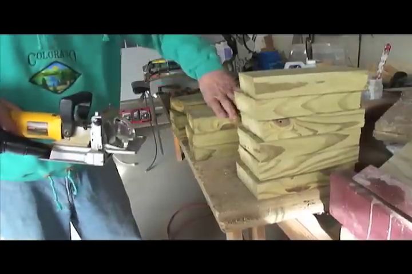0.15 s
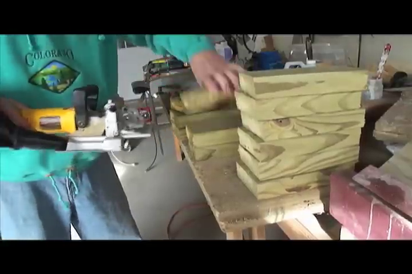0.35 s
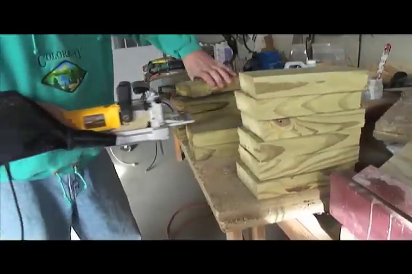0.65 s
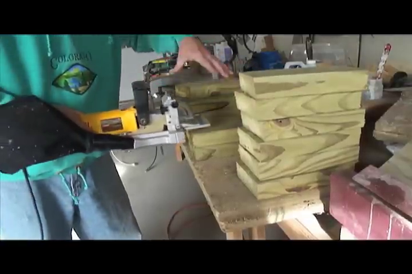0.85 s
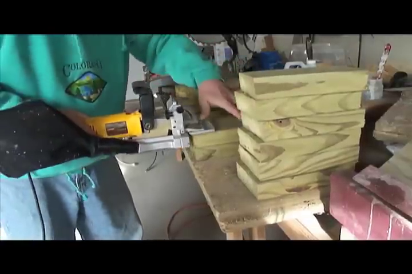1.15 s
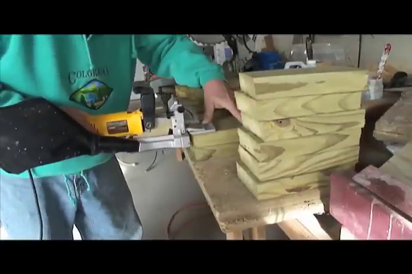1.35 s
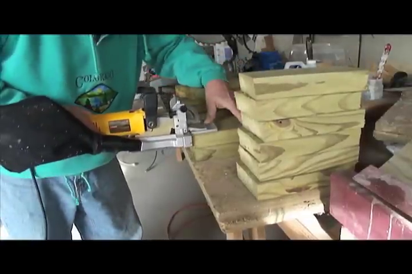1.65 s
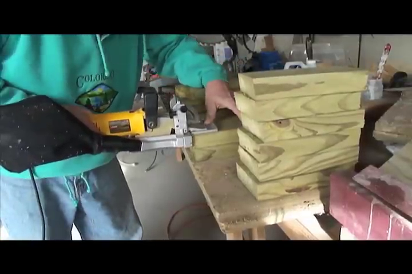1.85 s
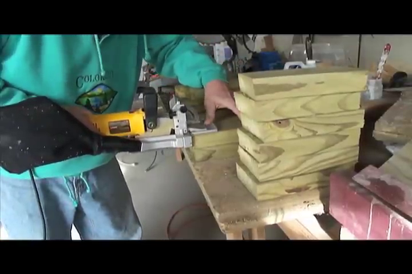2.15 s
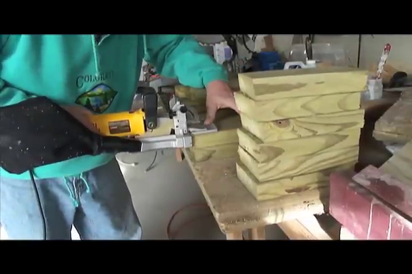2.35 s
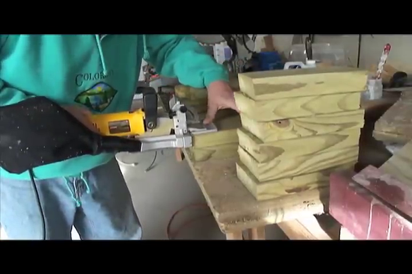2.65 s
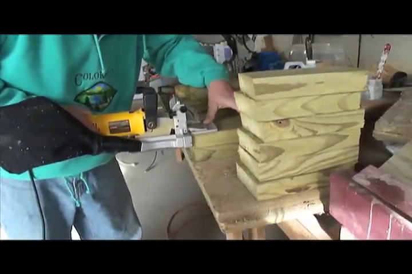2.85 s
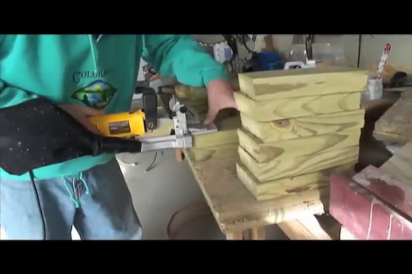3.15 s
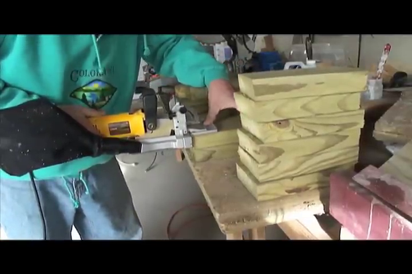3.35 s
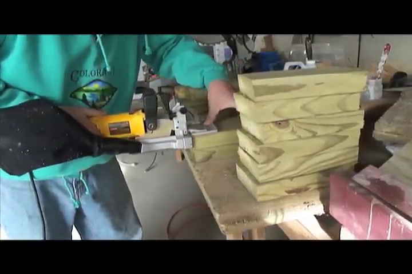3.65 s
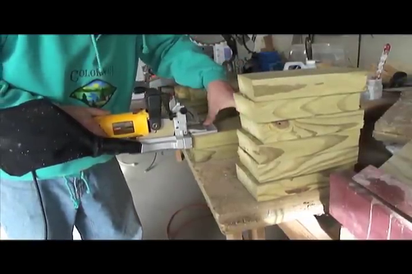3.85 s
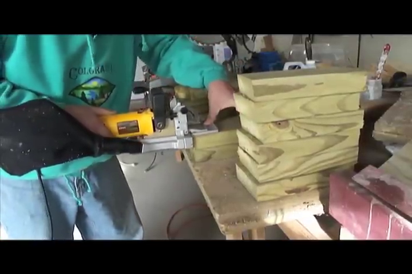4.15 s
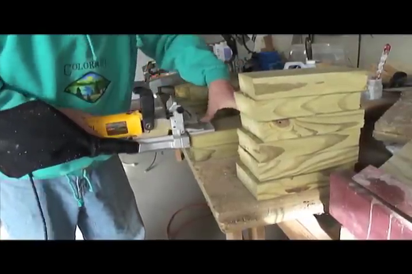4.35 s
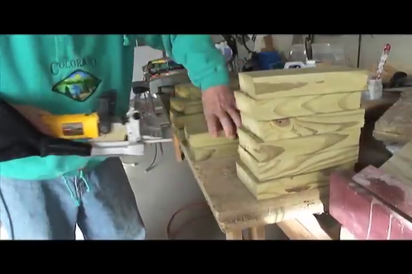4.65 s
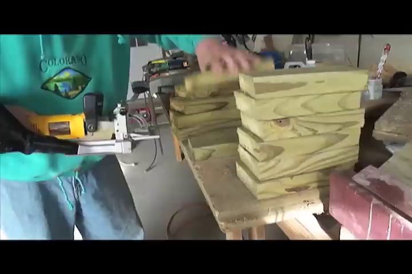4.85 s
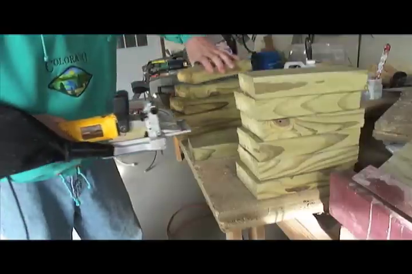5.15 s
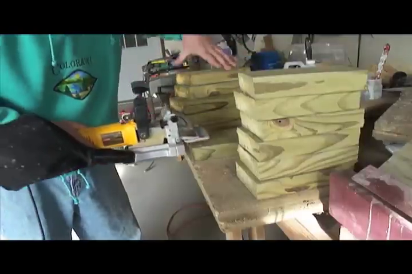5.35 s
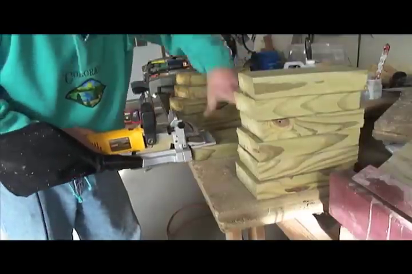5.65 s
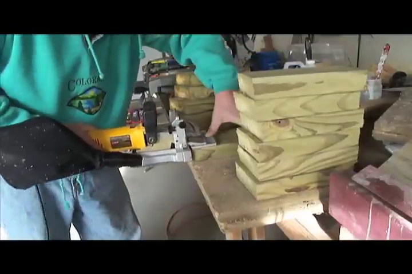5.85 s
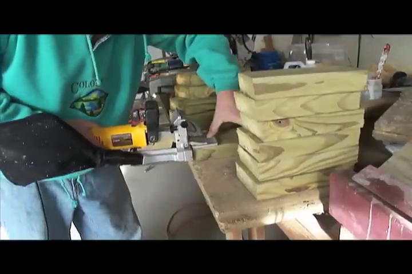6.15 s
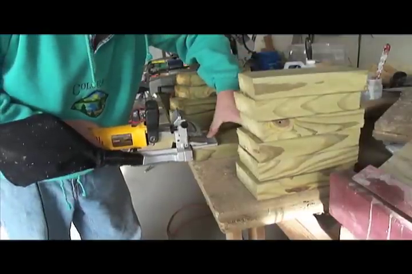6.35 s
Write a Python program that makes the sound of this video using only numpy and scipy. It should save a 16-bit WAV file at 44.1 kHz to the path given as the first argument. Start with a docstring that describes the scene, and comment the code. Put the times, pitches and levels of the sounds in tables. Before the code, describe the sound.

In a workshop, a biscuit joiner coasts down, its whine sliding lower while loose gears chatter and a board knocks on the bench. A switch snaps, the motor roars up, sags as the blade bites wood, recovers and is cut off. It coasts down again with gear rattle, board clacks and dull low bumps. Close microphone, short room echo, faint rumble.

```python
"""A biscuit joiner in a workshop: its motor whine sinks as it coasts, gears rattle and boards knock.
The switch snaps, the motor runs up, bogs as the blade plunges into wood, recovers and is cut off.
It coasts again; boards knock on the bench and dull low bumps follow, over a rumble that never stops.
Sine waves make the whine, hum and blade teeth; shaped noise makes air, buzz, growl, bumps and rumble.
Short noise bursts ring the gear case; fading sines make the switch and boards; hits echo in the room."""
import sys
import numpy as np
from scipy import signal
from scipy.fft import rfft, irfft, next_fast_len
from scipy.io import wavfile
from scipy.ndimage import map_coordinates

SR = 44100
rng = np.random.default_rng(int(sys.argv[2]) if len(sys.argv) > 2 else 0)


def inscribe(sig):
    """Save sig as 16-bit PCM at rate SR to the path in sys.argv[1].

    A 1-D sig is mono; a 2-D sig holds one channel per row.
    Samples are clipped to [-1, 1] before scaling.
    """
    pcm = np.round(np.clip(np.atleast_2d(sig).T, -1, 1) * 32767)
    wavfile.write(sys.argv[1], SR, pcm.astype(np.int16))


N = 286385  # length in samples

# All table levels are relative: the functions add their own trims.
# Motor under power, running up, bogging, recovering: t/s, whine f/Hz, whine level/dB, octave level/dB
POWERED_WHINE = [(3.49, 560, -70, -80), (3.52, 1500, -36, -48), (3.54, 1750, -27, -38),
                 (3.552, 1860, -23, -28), (3.57, 2150, -26, -44), (3.6, 2620, -26, -50),
                 (3.63, 3200, -32, -52), (3.75, 4000, -30, -52), (3.79, 4370, -39, -52),
                 (3.86, 4310, -38, -54), (3.93, 3780, -30, -54), (3.99, 3330, -32, -48),
                 (4.02, 3250, -40, -52), (4.05, 3560, -28, -52), (4.12, 3900, -29, -46),
                 (4.2, 4500, -34, -45), (4.25, 4630, -36, -50), (4.3, 4542, -36, -47)]
# How well the casing radiates the whine: whine f/Hz, whine level/dB, octave level/dB
RADIATED = [(560, -70, -80), (1100, -44, -64), (1400, -44, -60), (1650, -39, -56), (1900, -39, -46),
            (2060, -35, -54), (2250, -38, -45), (2400, -39, -44), (2600, -32, -44), (2950, -35, -43),
            (3280, -31, -45), (3450, -35, -50), (3750, -34, -50), (4200, -34, -44.5), (4600, -36, -47)]
# Noise under power: t/s, cooling air level/dB, buzz level/dB, vent hiss level/dB, growl level/dB
POWERED_NOISE = [(3.49, -43, -38, -52, -58), (3.5, -28, -40, -54, -25.5), (3.55, -27, -46, -40, -26),
                 (3.66, -27.5, -35, -36.5, -25.5), (3.72, -25.5, -27, -38, -29.5),
                 (3.86, -30, -36, -39, -32.5), (3.96, -34.5, -37, -38, -36), (4.0, -30.5, -39, -33, -41),
                 (4.05, -30, -38, -38, -30.5), (4.15, -25, -37, -37, -36), (4.3, -25.5, -28, -46, -46)]
# Cooling air spectrum: f/Hz, level/dB
AIR_SPECTRUM = [(35, -94), (60, -76), (335, -13), (408, -12), (750, -5), (912, -8), (995, -5), (1750, -2),
                (2230, -1.5), (4010, -8.5), (5210, -15), (8410, -25.5), (10900, -45.5), (14200, -91),
                (22000, -120)]
# Vent hiss spectrum: f/Hz, level/dB
VENT_SPECTRUM = [(2650, -47), (4500, 4.5), (5220, -3.5), (6080, 1.5), (6870, -8.5), (9660, -6.5),
                 (10900, -19), (14200, -62), (22000, -120)]
# Housing resonances: f/Hz, width/Hz, level/dB
HOUSING = [(792, 48.5, 0.5), (922, 98, 1), (1047, 101, 2.5)]
# Growl resonances: f/Hz, width/Hz, level/dB
GROWL = [(607, 30, -4), (755, 79, 1), (917, 34, 1), (1780, 89, -9.5)]
# Low hum around the powered spell: t/s, f/Hz, level/dB
HUM = [(3.49, 361, -80), (3.5, 365.5, -39), (3.65, 346.7, -42.5), (3.71, 338, -62), (3.8, 331.4, -46),
       (3.93, 317.4, -44), (3.99, 317, -65), (4.05, 343, -46), (4.2, 346, -46), (4.42, 326, -51),
       (4.55, 320, -86)]
# Loudness of the blade's tooth harmonics by pitch: f/Hz, level/dB
TEETH = [(630, 2), (800, -14), (2900, 0), (4400, 4), (5000, 5), (5600, 7), (6300, 3), (6900, -2), (7550, 2),
         (7900, -5), (8200, 0), (8600, -7), (9400, -5), (10700, -14)]
# Loose gear chatter: t/s, level/dB
CHATTER = [(0, -22), (1.95, -20), (2.04, -22), (2.1, -21.5), (3, -33.5), (3.49, -44), (3.6, -23),
           (4.3, -21), (5.5, -23.5), (6.49, -23.5)]
# Loud single clacks of the gears, a few with the switch snaps: t/s, level/dB, low part over that/dB
CLACKS = [(.424, -21, -17), (0.521, -13.5, -21), (0.7434, -17, 3), (.801, -16, -13), (0.821, -16, -12),
          (.8779, -18, -13), (.9208, -17, -15), (1.0464, -8.5, -24), (1.086, -10, -10), (1.183, -5, -23),
          (1.3224, -10, -28), (1.38, -13, -20), (1.4152, -12, -9), (1.4965, -20, -16), (1.5244, -13, -25),
          (1.551, -9, -10), (1.6162, -14, -18), (1.6413, -12, -6), (1.73, -16.5, 3), (1.8715, -12, -11),
          (1.8935, -13, -28), (1.9114, -6, -12), (2.0765, -10.5, -19), (2.0982, -7, -17), (2.122, -15, -8),
          (2.145, -13.5, -1.5), (2.1674, -11, -5), (2.192, -10.5, -16), (2.2253, -12, -11),
          (2.248, -13, -8), (2.2738, -8.5, -19), (2.3067, -5.5, -26), (2.333, -11, -13),
          (2.3575, -8.5, -4.5), (2.387, -10, -11), (2.415, -12, -6), (2.454, -15, -14), (2.469, -11, -26),
          (2.4928, -14.5, -2), (2.5277, -12.5, -15), (2.5548, -15.5, 0), (2.58, -20, -3),
          (2.618, -9.5, -13), (2.6514, -8.5, -6), (2.6842, -11, -10), (2.694, -15, -11),
          (2.7137, -10, -4.5), (2.751, -8.5, -13), (2.7882, -10.5, -3.5), (2.8194, -10, -9),
          (2.8574, -14, -10), (2.8747, -8, -9), (2.9016, -13.5, -14), (2.9285, -11, -13), (2.97, -12, -28),
          (2.9822, -19, -20), (3.012, -13.5, -13), (3.044, -15.5, -1), (3.071, -14.5, -21),
          (3.104, -9.5, -4), (3.1656, -10.5, -10), (3.191, -18.5, 1), (3.2238, -13, -2),
          (3.258, -11.5, -25), (3.2812, -26, 8.5), (3.342, -13.5, -0.5), (3.3863, -12.5, -11),
          (3.4083, -18, -6.5), (3.429, -21, -1), (3.4575, -16.5, -20), (3.492, -9, -6), (3.498, -3, -15),
          (3.549, -7, -10), (3.59, -13, -7), (3.674, -8, -16), (4.0718, -10, -15), (4.2817, -15, -24),
          (4.554, -11, -19), (4.673, -10, -6), (5.326, -7, -21), (5.5304, -10, -8), (5.597, -6.5, -21),
          (5.6527, -5, -25), (5.711, -6, -30), (5.755, -14, -23), (5.7767, -4.5, -16), (5.8318, -14, -16),
          (5.858, -9, -10), (5.901, -16, -11), (5.97, -14, -5), (5.993, -12.5, -27), (6.015, -13, -10),
          (6.0372, -7, -15), (6.0663, -13, -7), (6.104, -9.5, -5), (6.131, -13.5, -16), (6.196, -14, -5),
          (6.222, -14, -12), (6.27, -12.5, -8), (6.2903, -8.5, -16), (6.3085, -6.5, -25),
          (6.329, -7.5, -27), (6.4496, -9, -16), (6.4727, -14, -11)]
# Gearbox resonances: f/Hz, width/Hz, level/dB
GEARBOX = [(1574, 73, -8.5), (2319, 206, 2), (2985, 190, -4.5), (3365, 206, -7), (4500, 410, -12),
           (5075, 293, -11.5), (6077, 325, -10.5), (7750, 150, -21.5), (8780, 126, -21), (9580, 68, -21)]
# Snaps of the switch: t/s, level/dB
SNAPS = [(3.494, -10), (3.495, -27), (3.505, -15), (4.283, -6.5)]
# Ringing tones of the switch: f/Hz, level/dB, time to fade by 60 dB/s
SWITCH_TONES = [(1083, 2.5, 0.04), (1256, -1, 0.027), (1650, -7, 0.018), (1776, 1.5, 0.043),
                (2160, -7, 0.01), (3530, -7, 0.011)]
# Boards put down: t/s, level/dB, clack relative to that level/dB
KNOCKS = [(0.665, -27, 14), (0.689, -40, 15), (0.91, -38, 2), (5.184, -29.5, 25.5), (5.248, -35, 25.5)]
# Ringing tones of the bench: f/Hz, level/dB, time to fade by 60 dB/s
BENCH_TONES = [(130, -14, 0.23), (138, -4, 0.17), (161, 2, 0.074), (189, 2, .08), (282, 6.5, 0.093),
               (353, -2, 0.11)]
# Ringing tones of a board: f/Hz, level/dB, time to fade by 60 dB/s
BOARD_TONES = [(530, -12.5, 0.056), (720, -11, 0.054), (1070, -15, .04), (1391, 0.5, 0.055),
               (1580, 0, 0.067), (1686, 0, 0.061)]
# Dull low bumps: t/s, level/dB
BUMPS = [(5.725, -40), (5.779, -43), (5.809, -44), (5.849, -49), (5.969, -38), (5.995, -18.5), (6.042, -23),
         (6.06, -26), (6.088, -28), (6.109, -30), (6.129, -24.5), (6.163, -29), (6.199, -43), (6.219, -39),
         (6.394, -35)]
# Bump spectrum: f/Hz, level/dB
BUMP_SPECTRUM = [(15, -58), (40, -9), (110, -5), (189, -2), (309, -6.5), (348, -13), (554, -17), (600, -22),
                 (780, -50), (1320, -120)]
# How long the room rings: f/Hz, time to fade by 60 dB/s
ROOM_FADE = [(100, 0.85), (1000, 0.13), (10000, 0.12)]
# Workshop rumble: t/s, level/dB
RUMBLE = [(0, -70), (1, -58), (2.2, -59), (3.3, -54), (4.4, -57), (5, -64.5), (5.4, -52.5), (6.49, -58)]
# Rumble spectrum: f/Hz, level/dB
RUMBLE_SPECTRUM = [(25, -40), (60, -17), (130, -5.5), (200, -8), (255, 3.5), (290, -5), (340, 6),
                   (450, -9.5), (900, -36), (2000, -120)]

SWITCH_ON_S = 3.49
FIRST_OFF_S, SECOND_OFF_S = -.205, 4.3  # the first cut comes before the sound begins
# Coasting: whine pitch at the cut, share of it lost per second to air, steady loss to the bearings
FREE_HZ, DRAG_PER_S, FRICTION_HZ_PER_S = 4542, .1953, 633.5
RAGGED_COASTING, RAGGED_POWERED = .12, .57  # share of smear in each tone, 0 to 1
# Coasting noise levels, before trims
AIR_DB, AIR_DB_PER_KHZ = -41.5, 4  # level extended down to zero pitch, growth with whine pitch
BUZZ_DB, BUZZ_FADES_HZ, BUZZ_DB_PER_KHZ = -32.5, 1060, 20  # fades below this whine pitch
HISS_DB = -47
CUT_S, CUT_LENGTH_S, CUT_RAMP_S, CUT_DB = 3.74, .27, .04, -46  # blade in wood; ramp is in and out
TOOTH_RATIO = 7  # whine cycles per tooth bite
CHATTER_RATE, CHATTER_RATE_POWERED = 90, 130  # average clacks per second
TOP_HZ = 11000


def motor():
    """The spinning armature whines while its airflow, casing and blade add their own sounds."""
    hz, on = speed()
    whine_db, octave_db, air_db, buzz_db, hiss_db, growl_db = motor_levels(hz, on)
    turn = 2 * np.pi * np.cumsum(hz) / SR + .2 * wobble(150)
    air = amp(air_db + 0.4 * wobble(60) + 0.94 * wobble(15)) * coloured(AIR_SPECTRUM)
    hiss = amp(hiss_db - 1 + 1.6 * wobble(23)) * coloured(VENT_SPECTRUM)
    buzz = amp(buzz_db - 4.5 + 2.26 * wobble(40)) * unit(resonant(rng.standard_normal(N), HOUSING))
    growl = amp(growl_db + 0.82 * wobble(65)) * unit(resonant(rng.standard_normal(N), GROWL))
    return whine(turn, on, whine_db, octave_db) + hum() + air + hiss + buzz + growl + blade(hz, turn)


def speed():
    """Whine pitch, drawn over time under power and slowed by air and bearings when off; power on or not."""
    t = np.arange(N) / SR
    on = (t >= SWITCH_ON_S) & (t < SECOND_OFF_S)
    since_off = t - np.where(t < SECOND_OFF_S, FIRST_OFF_S, SECOND_OFF_S)
    friction_hz = FRICTION_HZ_PER_S / DRAG_PER_S
    coasting = (FREE_HZ + friction_hz) * np.exp(-DRAG_PER_S * since_off) - friction_hz
    return np.where(on, curves(POWERED_WHINE)[0], coasting), on


def motor_levels(hz, on):
    """Levels in dB: coasting mostly set by speed, with wandering hiss; under power drawn over time."""
    pitch, whine_db, octave_db = np.transpose(RADIATED)
    _, powered_whine_db, powered_octave_db = curves(POWERED_WHINE)
    whine_db = np.where(on, powered_whine_db, np.interp(hz, pitch, whine_db))
    octave_db = np.where(on, powered_octave_db, np.interp(hz, pitch, octave_db))
    air_db = AIR_DB + AIR_DB_PER_KHZ * hz / 1000
    buzz_db = BUZZ_DB - BUZZ_DB_PER_KHZ * np.maximum(BUZZ_FADES_HZ - hz, 0) / 1000
    coasting = (air_db, buzz_db, HISS_DB + 2 * wobble(3), -120)  # no audible growl
    noise_db = [np.where(on, a, b) for a, b in zip(curves(POWERED_NOISE), coasting)]
    return [whine_db, octave_db] + noise_db


def whine(turn, on, whine_db, octave_db):
    """Tones locked to the armature's turning; sparking brushes smear them more under power."""
    ragged = np.where(on, RAGGED_POWERED, RAGGED_COASTING)

    def tone(order):
        """A steady sine mixed with a randomly wavering one, which spreads it into a band."""
        steady = np.sin(order * turn)
        smeared = wobble(350) * steady + wobble(350) * np.cos(order * turn)
        return (1 - ragged) * steady + ragged * smeared

    main = amp(whine_db + 3 + 2.5 * wobble(30)) * tone(1)
    # the armature pulls unevenly once a turn (twelve whine cycles), more so under power
    main *= 1 + 1.3 * ragged * np.cos(turn / 12 + wobble(40))
    upper = tone(2) + amp(-19) * tone(3)
    return main + amp(octave_db + 3 + 2.5 * wobble(30)) * upper


def hum():
    """A low sine with a slowly changing pitch and slightly unsteady loudness."""
    hz, db = curves(HUM)
    phase = 2 * np.pi * np.cumsum(hz) / SR + 0.5 * wobble(30)
    return amp(db + 1.6 * wobble(24.96)) * np.sin(phase)


def blade(hz, turn):
    """Each tooth bites once a pass: harmonics of the tooth rate, each wavering randomly in loudness."""
    bite = np.zeros(N)
    for k in range(1, 18):
        loudness = amp(along(TEETH, k * hz / TOOTH_RATIO) + 3 * wobble(40))
        bite += loudness * np.sin(k * turn / TOOTH_RATIO + .5 * wobble(150))
    into = np.arange(N) / SR - CUT_S
    in_wood = np.clip(np.minimum(into, CUT_LENGTH_S - into) / CUT_RAMP_S, 0, 1)
    return amp(CUT_DB) * in_wood * bite


def gears():
    """Play between the gears: loud clacks, a few with the switch snaps, over irregular chatter."""
    chatter_db, = curves(CHATTER)
    rate = np.where(speed()[1], CHATTER_RATE_POWERED, CHATTER_RATE)
    at = np.flatnonzero(rng.random(N) < rate / SR)  # each sample has a small chance of a clack
    size = amp(chatter_db + 10.5 + 2.0 * rng.standard_normal(N))[at]
    s, db, low_db = np.transpose(CLACKS)
    chatter = bursts(at / SR, size, 0.011, 0.0018)
    clacks = bursts(s, amp(db + 6.0), 0.014, 0.0024)
    high = (chatter + clacks) * np.sign(rng.standard_normal(N))
    low = bursts(s, amp(db + low_db + 7.5), 0.025, 0.0023) * rng.standard_normal(N)
    clatter = amp(9) * resonant(high, GEARBOX) + amp(10.0) * resonant(low, HOUSING)
    # a small body radiates little bass
    return filtered(clatter, lambda hz: (1j * hz / (500 + 1j * hz)) ** 2)


def switch_and_boards():
    """A snap rings the switch; a board put down rings both the bench and itself."""
    out = np.zeros(N + SR)
    for s, db in SNAPS:
        out[round(s * SR):][:SR // 2] += amp(db - 9.5) * ring(SWITCH_TONES, 0.00039)
    for s, db, clack_db in KNOCKS:
        knock = ring(BENCH_TONES, 0.0049) + amp(clack_db + 2) * ring(BOARD_TONES, 0.0069)
        out[round(s * SR):][:SR // 2] += amp(db - 10.5) * knock
    return out[:N]


def bumps():
    """Dull low bumps without ring, perhaps handling: low noise that swells and fades with each one."""
    s, db = np.transpose(BUMPS)
    swell = bursts(s, amp(db), 0.072, 0.0069)
    return amp(7) * swell * coloured(BUMP_SPECTRUM)


def room(x):
    """The workshop answers with a noise tail in which each frequency dies at its own speed."""
    hz, t, z = signal.stft(rng.standard_normal(SR // 2), SR, nperseg=256)
    fade = amp(-60 * t / along(ROOM_FADE, hz)[:, None])
    tail = signal.istft(z * fade, SR, nperseg=256)[1]
    delayed = np.pad(x, (300, 0))  # samples before the answer begins
    return signal.fftconvolve(delayed, tail / np.linalg.norm(tail))[:N]


def rumble():
    """Low noise of the workshop, slowly changing in level."""
    return amp(curves(RUMBLE)[0]) * coloured(RUMBLE_SPECTRUM)


def amp(db):
    """Turn a level in dB into a gain."""
    return 10 ** (np.asarray(db) / 20)


def unit(x):
    """Scale a sound to an average strength (rms) of 1."""
    return x / np.sqrt(np.mean(x ** 2) + 1e-20)


def along(points, hz):
    """Read a value between (Hz, value) points on a log frequency axis."""
    f, v = np.transpose(points)
    return np.interp(np.log(hz + 1), np.log(f + 1), v)


def curves(rows):
    """One value per sample for each column after the time."""
    s, *cols = np.transpose(rows)
    return [np.interp(np.arange(N) / SR, s, c) for c in cols]


def wobble(rate):
    """A smooth random curve through this many random points a second."""
    points = rng.standard_normal(int(N * rate / SR) + 4)
    return map_coordinates(points, [np.arange(N) * rate / SR])


def filtered(x, response):
    """Change the strength and phase of each frequency by a given response."""
    m = next_fast_len(N + SR // 2)
    return irfft(rfft(x, m) * response(np.fft.rfftfreq(m, 1 / SR)), m)[:N]


def resonant(x, modes):
    """A body favours sound near its resonances; their signs alternate."""
    def response(f):
        total = 0
        for k, (centre, width, db) in enumerate(modes):
            peak = 1j * f * width / (centre * centre - f * f + 1j * f * width)
            total = total + (-1) ** k * amp(db) * peak
        return total

    return filtered(x, response)


def coloured(spectrum):
    """Noise of rms 1 with a given spectrum."""
    return unit(filtered(rng.standard_normal(N), lambda hz: amp(along(spectrum, hz))))


def bursts(times, gains, t60, rise):
    """Loudness curve of short bursts: a rise, then a decay by 60 dB in t60 seconds."""
    kicks = np.bincount(np.round(times * SR).astype(int), gains, N)[:N]
    t = np.arange(SR // 8) / SR
    shape = amp(-60 * t / t60) * (1 - np.exp(-t / rise))
    return signal.fftconvolve(kicks, shape)[:N]


def ring(modes, rise):
    """One blow makes a body's tones ring and fade, each struck a little differently."""
    t = np.arange(SR // 2) / SR
    scatter_db = 2 * rng.standard_normal(len(modes))
    total = np.zeros(len(t))
    for (hz, db, t60), more_db in zip(modes, scatter_db):
        total += amp(db + more_db - 60 * t / t60) * np.sin(2 * np.pi * hz * t)
    return total * (1 - np.exp(-t / rise))


def scene():
    """Add the machine, the hits, the room's answer to the hits, the bumps and the rumble."""
    hits = gears() + switch_and_boards()
    return (motor() + hits + bumps() + amp(-7.0) * room(hits) + rumble())[None]


def record(dry):
    """The microphone rolls off the deep bass and nothing passes from the band limit up."""
    return filtered(dry[0], lambda hz: (hz < TOP_HZ) * (1j * hz / (70 + 1j * hz)) ** 2)[None]


dry = scene()
out = record(dry)
inscribe(out)
```